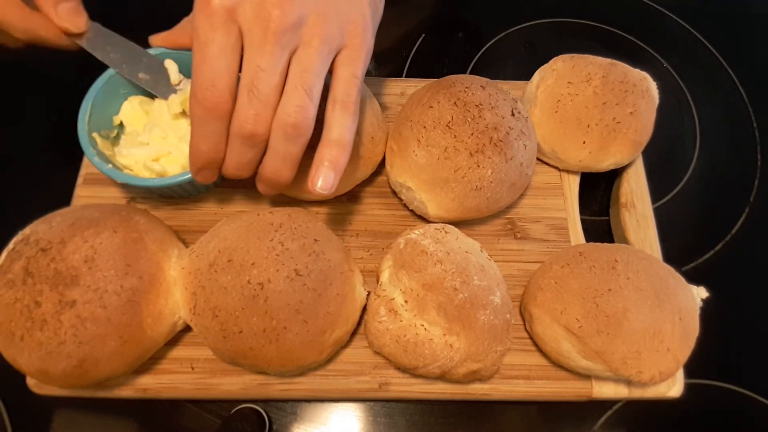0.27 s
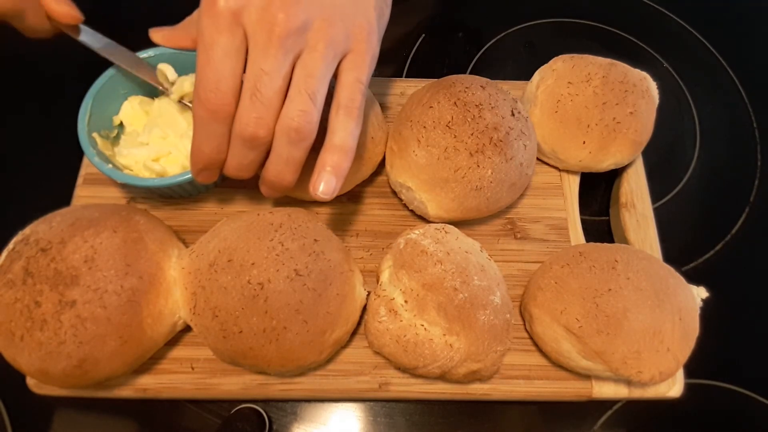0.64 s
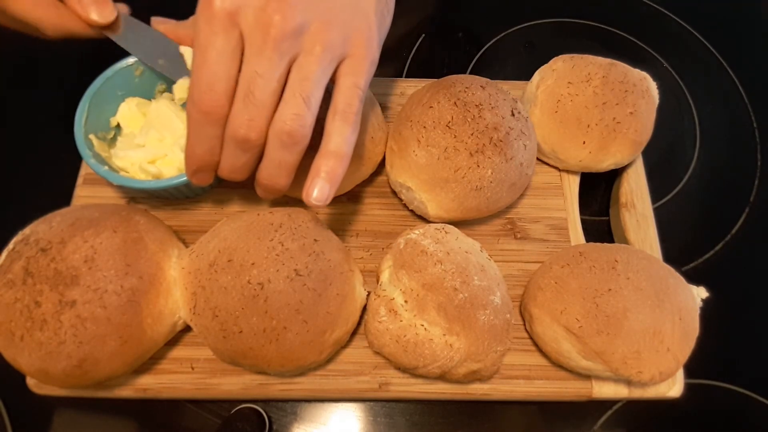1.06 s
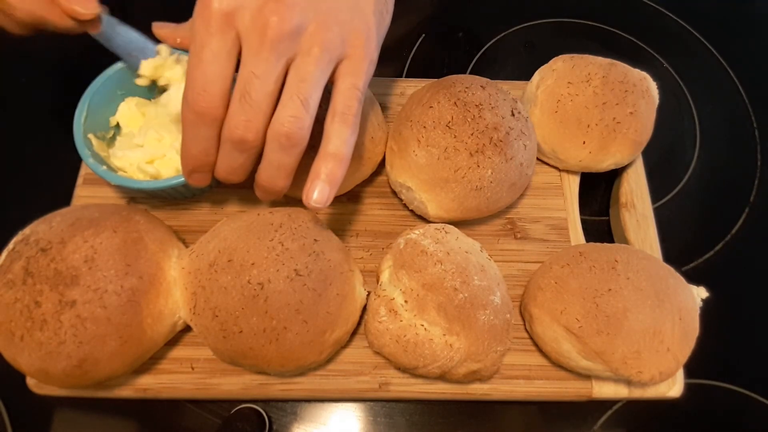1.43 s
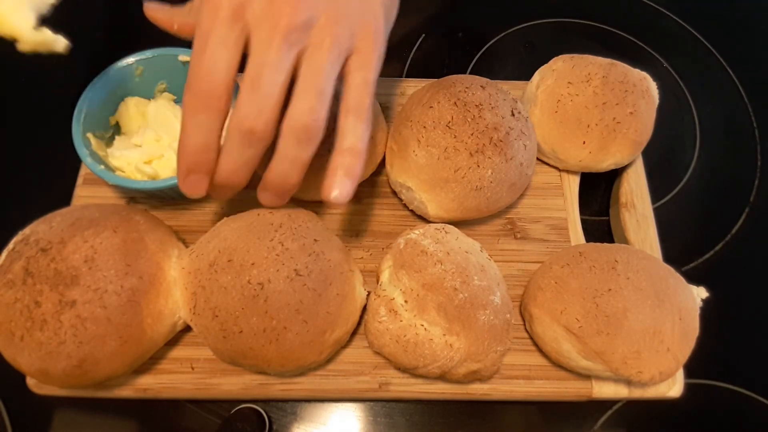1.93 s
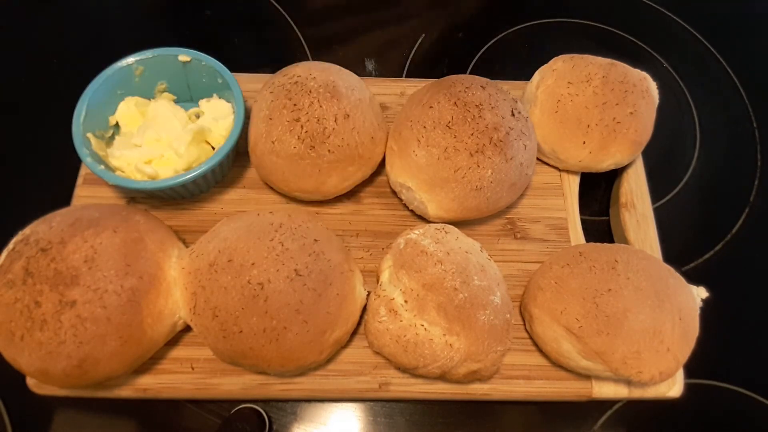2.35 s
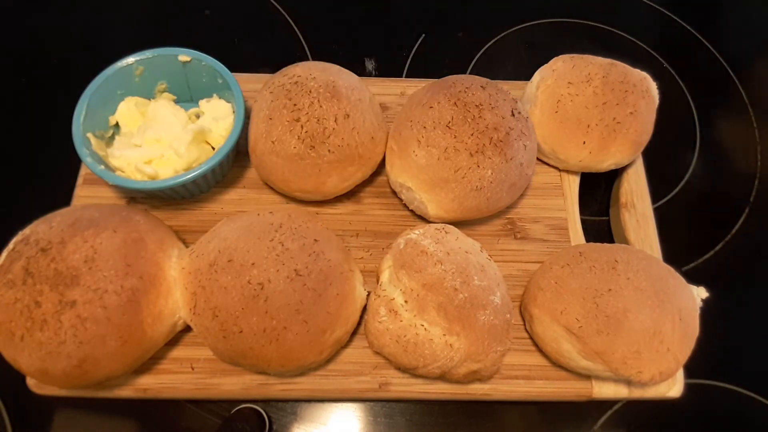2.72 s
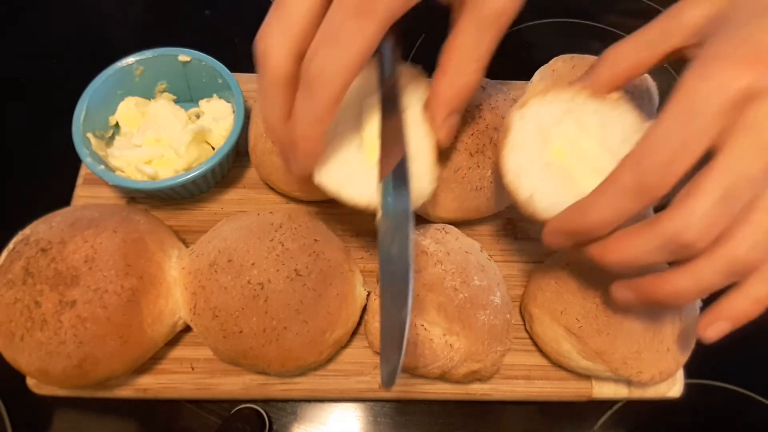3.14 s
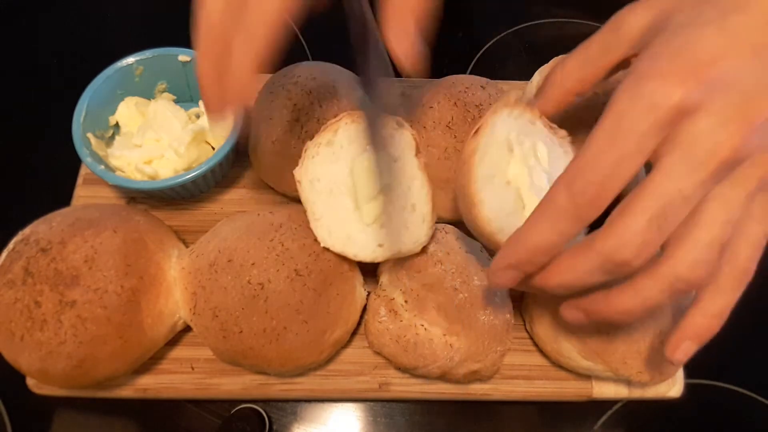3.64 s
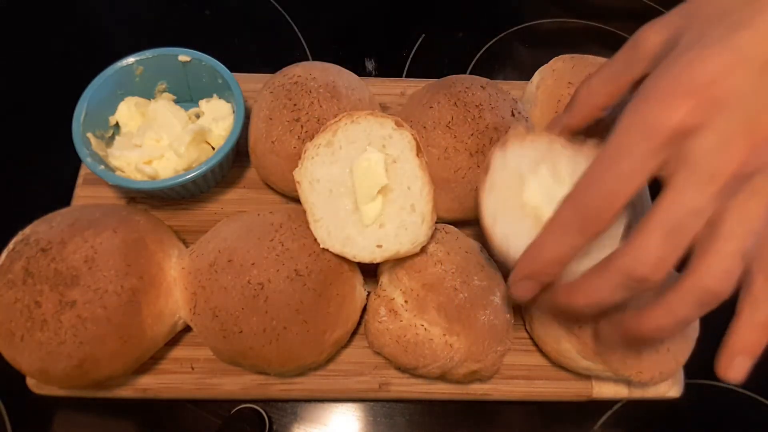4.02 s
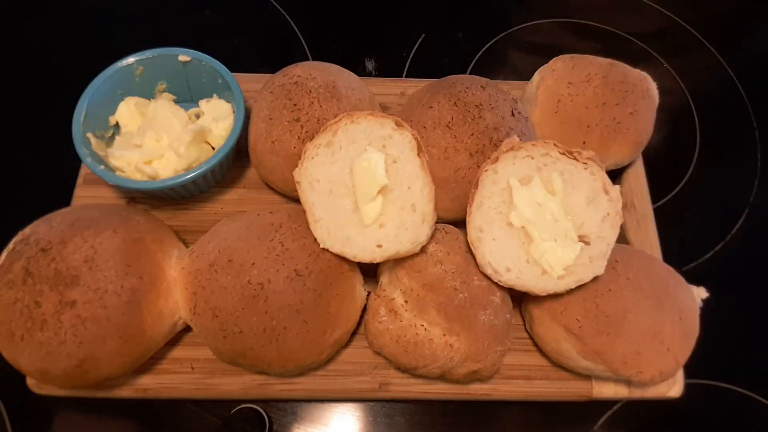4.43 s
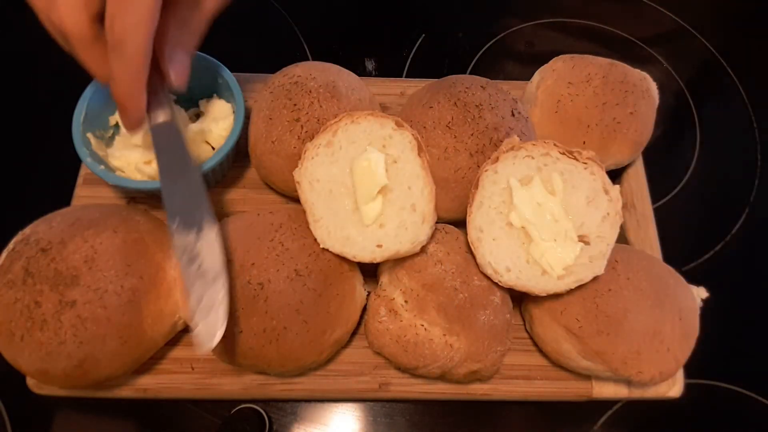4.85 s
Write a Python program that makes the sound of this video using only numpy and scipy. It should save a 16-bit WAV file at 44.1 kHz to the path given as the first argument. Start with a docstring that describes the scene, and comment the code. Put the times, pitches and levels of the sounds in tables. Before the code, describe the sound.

A knock and a knife click open a string of small taps as butter is scooped from a bowl on a wooden board. A pause follows, then a short, dull shove on the counter. Faint rubbing of bread leads to a thump with a scrape of crust, and another thump with a few little taps. The sounds are near, with slight reverberation from a small kitchen and a faint, low background noise.

```python
"""A small, quiet kitchen: bread rolls are buttered on a wooden board that lies on a glass hob.
A table knife digs butter from a bowl, ticking on it, and blows of knife and rolls excite the board's modes.
Friction makes the soft rubbing, the scrape of crust on crust and a shove against the counter, which also
carries a few dull bumps. The room reverberates after every blow, over a low steady noise."""
import sys
import numpy as np
from scipy import signal
from scipy.fft import rfft, irfft, next_fast_len
from scipy.io import wavfile

SR = 44100
rng = np.random.default_rng(int(sys.argv[2]) if len(sys.argv) > 2 else 0)


def file_out(sig):
    """Save sig as 16-bit WAV at sys.argv[1]."""
    # one column per channel
    cols = np.atleast_2d(sig).T
    # limit, then scale
    lim = np.clip(cols, -1, 1)
    pcm = np.round(lim * 32767).astype(np.int16)
    wavfile.write(sys.argv[1], SR, pcm)


N = 224072

# blows on the board, and at 2.65 s the firm start of the shove against the counter: start_s, thump_db,
# clatter_db, tilt_db_per_octave (a short contact is brighter)
BOARD_BLOWS = [(.0065, -26, -39.5, 3.5), (0.258, -40.5, -71, -3), (0.369, -43, -60.5, -2.5),
               (.551, -48, -55.5, 7), (.627, -33.5, -56.5, 0), (.663, -41.5, -63, 8.5),
               (.71, -47, -60, -14), (0.798, -49, -77, -3), (0.946, -42, -50, -17), (0.96, -38, -60, 2),
               (1.173, -41.5, -55, -4.5), (1.939, -49, -68, 14.5), (2.650, -37.5, -48, 2),
               (2.68, -38, -61, -8), (2.91, -52, -61, 13), (3.409, -48.5, -60, -1.5),
               (3.694, -27.5, -52, 4), (4.159, -37.5, -54.5, 6), (4.176, -25, -45.5, -1),
               (4.233, -46, -50, 4), (4.248, -38.5, -57, -11.5), (4.334, -46.5, -56.5, -1)]
# low modes of the loaded board: pitch_hz, level_db, t60_s
BOARD_MODES = [(71.6, -35.5, 0.39), (121, -22.5, 0.16), (152, 3, 0.067), (199.2, -5.5, .11),
               (253.5, -11.5, 0.1), (317.3, -13, 0.088), (358.7, -18, 0.086), (520.5, -35, 0.11)]
# its dense upper modes: frequency_hz, density_db
CLATTER_SPECTRUM = [(120, -29.5), (300, -7), (500, -3.5), (750, -13), (1100, -16.5), (2000, -29.5),
                    (4000, -41.5), (9000, -55.5)]
def board_knocks(clatter_gain_db=-4, attack_s=0.0066, clatter_t60_s=0.11, radiate_hz=40):
    """Modal vibration: a cushioned blow swings the low modes; the upper ones overlap into a clatter."""
    out, t = np.zeros(N), np.arange(SR // 2) / SR
    for start_s, thump_db, clatter_db, tilt in BOARD_BLOWS:
        thump = ring(BOARD_MODES, t, tilt) * (1 - np.exp(-t / attack_s))
        thump /= np.abs(thump).max()
        clatter = unit(coloured(rng.standard_normal(len(t)), CLATTER_SPECTRUM))
        clatter *= amp(clatter_gain_db - 60 * t / clatter_t60_s)
        add(out, start_s, amp(thump_db) * thump + amp(clatter_db) * clatter)
    # a small board radiates little deep bass
    return filtered(out, lambda hz: (1j * hz / (radiate_hz + 1j * hz)) ** 2)


# hard contacts of the blade: start_s, level_db, tilt_db_per_octave
BLADE_CONTACTS = [(.0045, -37.5, -3), (0.2563, -50.5, -11), (0.9451, -44.5, -7), (1.172, -58, -4),
                  (4.174, -55.5, 7)]
# resonances of the blade: frequency_hz, density_db
BLADE_SPECTRUM = [(200, -23.5), (700, -11.5), (1400, 1.5), (2100, 6), (2700, -8.5), (3600, -7),
                  (4500, -19.5), (7000, -20), (10000, -31), (16000, -25.5)]
def blade_ticks(gain_db=11, crack_t60_s=0.0082, ring_db=-17, ring_t60_s=0.087):
    """Damping: the struck blade clicks, and butter and fingers absorb its ring at once."""
    out, t = np.zeros(N), np.arange(SR // 8) / SR
    for start_s, level_db, tilt in BLADE_CONTACTS:
        decay = amp(-60 * t / crack_t60_s) + amp(ring_db - 60 * t / ring_t60_s)
        click = tilted(coloured(rng.standard_normal(len(t)) * decay, BLADE_SPECTRUM), tilt)
        add(out, start_s, amp(level_db + gain_db) * click / np.linalg.norm(click))
    return out


# crust sliding on crust: frequency_hz, density_db
CRUST_SPECTRUM = [(60, -31), (220, -2), (330, 3.5), (510, 1), (720, -4.5), (1050, -12), (1350, -10.5),
                  (1900, -13.5), (2400, -21), (3200, -22.5), (4200, -36), (5500, -40.5), (6500, -36),
                  (9000, -42.5), (15500, -47)]
def crust_skid():
    """Dry friction: a half roll skids over its neighbour's crust before it lands."""
    return scrape(CRUST_SPECTRUM, start_s=3.655, hold_s=0.024, level_db=-43, rise_s=0.001, t60_s=0.29)


# strokes of blade, butter, fingers and bread: start_s, length_s, level_db, tilt_db_per_octave
RUB_STROKES = [(0.613, 0.12, -73.5, 4.5), (2.59, 0.1, -79, 5.5), (3.43, 0.22, -70.5, 1.5),
               (3.955, 0.08, -69, 0), (4.158, 0.32, -73, 3.5), (4.708, 0.16, -66.5, -1)]
# soft surfaces rubbing: frequency_hz, density_db
RUB_SPECTRUM = [(100, -18), (300, 13), (650, 11), (1400, 3), (2600, -8.5), (4500, -18.5), (5600, -23.5),
                (15000, -41)]
def soft_rubs():
    """Sliding friction: many tiny slips merge into a noise that swells and fades with each stroke."""
    out = np.zeros(N)
    for start_s, length_s, level_db, tilt in RUB_STROKES:
        n = int(length_s * SR)
        friction = tilted(coloured(grains(n, rate_hz=3000, spread_db=3.5), RUB_SPECTRUM), tilt)
        add(out, start_s, amp(level_db) * np.sqrt(np.hanning(n)) * unit(friction))
    return out


# response of the counter: frequency_hz, density_db
COUNTER_SPECTRUM = [(40, -13), (70, -9.5), (125, 3), (190, 1), (240, -9.5), (330, -6), (570, -11),
                    (850, -14.5), (1150, -25.5), (1800, -27.5), (2800, -31.5), (4000, -50), (7000, -54),
                    (15000, -66)]
def counter_shove():
    """Forced vibration: something shoved against the counter drives it by friction."""
    return scrape(COUNTER_SPECTRUM, start_s=2.648, hold_s=0.014, level_db=-42.5, rise_s=0.0006, t60_s=0.44)


# dull bumps through the counter: start_s, level_db, pitch_hz
COUNTER_BUMPS = [(2.655, -43, 122.6), (2.725, -45, 52.3), (3.701, -41.5, 67), (4.732, -54, 40.6)]
def counter_bumps(attack_s=0.018, t60_s=0.25):
    """Free vibration: the heavy counter swings at a low pitch and dies away."""
    out, t = np.zeros(N), np.arange(SR // 2) / SR
    for start_s, level_db, pitch_hz in COUNTER_BUMPS:
        add(out, start_s, ring([(pitch_hz, level_db, t60_s)], t) * (1 - np.exp(-t / attack_s)))
    return out


# modes of the kitchen: pitch_hz, level_db, t60_s
STANDING_WAVES = [(128.4, -73.5, 0.49), (175.4, -67, 0.32), (214.14, -52.5, 0.32), (303, -62, 0.23)]
# echoes from hard surfaces near the hob: delay_s, level_db
WALL_ECHOES = [(0.0163, -8), (0.0216, -14), (0.041, -9)]
def kitchen(x, tail_db, wall_db, tails=1, crossfade_s=0.015):
    """Convolution: the room adds standing waves, early echoes and a diffuse tail to the direct sound."""
    t = np.arange(SR // 2) / SR
    early = ring(STANDING_WAVES, t, phase=np.pi / 2)
    early[0] = 1  # the direct path
    for delay_s, level_db in WALL_ECHOES:
        add(early, delay_s, amp([level_db + wall_db]))
    out = signal.fftconvolve(x, early)[:N]
    # several diffuse tails take turns, keeping the reverberation smooth and free of ringing tones
    turn = np.arange(N) / SR / crossfade_s
    for k in range(tails):
        offset = np.abs((turn - k) % tails - tails / 2)
        share = np.cos(np.pi / 2 * np.minimum(offset, 1)) if tails > 1 else 1
        late = signal.fftconvolve((share * x)[None], diffuse_tail(t), axes=1)[:, :N]
        out = out + amp(tail_db) * late
    return out


# reverberation time of the kitchen: frequency_hz, t60_s
REVERB_TIMES = [(80, 1), (210, 0.3), (560, 0.29), (1500, 0.64), (4000, 0.83), (12000, 0.61)]
def diffuse_tail(t, build_up_s=0.032):
    """Reverberation: reflections build up, then each frequency is absorbed at its own rate."""
    hz, frame_s, bands = signal.stft(stereo_noise(len(t)), SR, nperseg=256)
    decay = amp(-60 * frame_s / along(REVERB_TIMES, hz)[:, None])
    tail = signal.istft(bands * decay, SR, nperseg=256)[1][:, :len(t)]
    tail *= 1 - np.exp(-t / build_up_s)
    return tail / np.linalg.norm(tail[0])


# likeness of left and right: frequency_hz, coherence_ratio
COHERENCE = [(100, 1), (500, 0.877), (1500, 0.71), (3000, 0.73), (6000, 0.64), (15000, 0.57)]
def stereo_noise(n):
    """Spatial coherence: noise at two nearby points is alike in the bass, less so in the treble."""
    def mid_side_gains(hz):
        angle = np.arccos(np.clip(along(COHERENCE, hz), 0, 1)) / 2
        return np.array([np.cos(angle), np.sin(angle)])
    mid, side = filtered(rng.standard_normal((2, n)), mid_side_gains)
    return np.array([mid + side, mid - side])


# the steady noise floor: frequency_hz, density_db
FLOOR_SPECTRUM = [(20, -8), (45, -10.5), (80, -4.5), (130, 0), (220, -6), (280, -7.5), (360, -9),
                  (550, -13), (1000, -19.5), (1900, -25), (5300, -37), (6500, -35), (8500, -39),
                  (15500, -37)]
def background(room_db=-66, hiss_db=-84, split_hz=4000):
    """Stationary noise: a low room sound crosses over into a faint, even hiss."""
    low_share = lambda hz: 1 / (1 + (hz / split_hz) ** 4)
    floor = lambda hz: amp(along(FLOOR_SPECTRUM, hz))
    room = filtered(stereo_noise(N), lambda hz: floor(hz) * np.sqrt(low_share(hz)))
    hiss = filtered(stereo_noise(N), lambda hz: floor(hz) * np.sqrt(1 - low_share(hz)))
    return amp(room_db) * unit(room) + amp(hiss_db) * unit(hiss)


def scrape(spectrum, start_s, hold_s, level_db, rise_s, t60_s):
    """Stick-slip: a sliding surface catches and lets go in a short burst of snaps."""
    out, t = np.zeros(N), np.arange(SR // 3) / SR
    stroke = (1 - np.exp(-t / rise_s)) * amp(-60 * np.maximum(t - hold_s, 0) / t60_s)
    snaps = unit(coloured(grains(len(t), rate_hz=2700, spread_db=0), spectrum))
    add(out, start_s, amp(level_db) * stroke * snaps)
    return out


def grains(n, rate_hz, spread_db):
    """Shot noise: tiny snaps of either sign arrive at random."""
    chance, size = rng.random(n), rng.standard_normal(n)
    return (chance < rate_hz / SR) * amp(spread_db * np.clip(size, -2, 2)) * rng.choice([-1, 1], n)


def ring(modes, t, tilt=0, phase=0):
    """Normal modes: a sum of damped sines, tilted in dB per octave from the first."""
    return sum(amp(db + tilt * np.log2(hz / modes[0][0]) - 60 * t / t60_s)
               * np.sin(2 * np.pi * hz * t + phase) for hz, db, t60_s in modes)


def coloured(x, spectrum, size=4096):
    """Minimum-phase filtering: folding the cepstrum gives a causal response with this spectrum."""
    cepstrum = irfft(np.log(amp(along(spectrum, np.fft.rfftfreq(size, 1 / SR)))))
    fold = np.r_[1, np.full(size // 2 - 1, 2), 1, np.zeros(size // 2 - 1)]
    impulse_response = irfft(np.exp(rfft(cepstrum * fold)))
    return signal.fftconvolve(x, impulse_response)[:len(x)]


def tilted(x, db_per_octave, pivot_hz=1500):
    """Spectral tilt: a slope about a pivot brightens or dulls a sound."""
    return filtered(x, lambda hz: amp(db_per_octave * np.log2(np.maximum(hz, 200) / pivot_hz)))


def filtered(x, response):
    """Linear filtering: the spectrum is multiplied by a frequency response."""
    n = x.shape[-1]
    padded = next_fast_len(n + SR // 4)
    return irfft(rfft(x, padded) * response(np.fft.rfftfreq(padded, 1 / SR)), padded)[..., :n]


def along(points, hz):
    """Interpolation on a log frequency axis."""
    frequencies, values = np.transpose(points)
    return np.interp(np.log(hz + 1), np.log(frequencies), values)


def add(track, start_s, sound):
    """Superposition: a sound adds to the track from its start time."""
    start = max(0, round(start_s * SR))
    track[start:start + len(sound)] += sound[:len(track) - start]


def amp(db):
    """Decibels to amplitude ratio."""
    return 10 ** (np.asarray(db) / 20)


def unit(x):
    """Normalisation to rms 1."""
    return x / np.sqrt(np.mean(x ** 2) + 1e-20)


def scene():
    """Superposition: board, blade and bread sound in the same small kitchen."""
    board = kitchen(board_knocks(), tail_db=-14.5, wall_db=-5.5)
    blade = kitchen(blade_ticks(), tail_db=-11, wall_db=-18, tails=3)
    sliding = kitchen(counter_shove() + crust_skid() + soft_rubs(), tail_db=-8.5, wall_db=-6.5, tails=4)
    return board + blade + sliding + counter_bumps() + background()


def record(dry, low_cut_hz=45, top_hz=15700):
    """Band limiting: the deepest bass rolls off and the highest treble is cut."""
    thinned = filtered(dry, lambda hz: 1j * hz / (low_cut_hz + 1j * hz))
    return filtered(thinned, lambda hz: hz < top_hz)


dry = scene()
out = record(dry)
file_out(out)
```